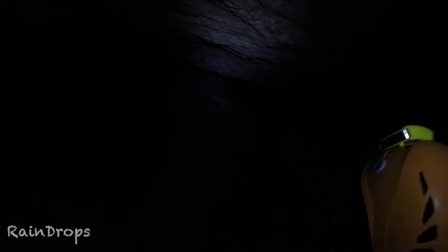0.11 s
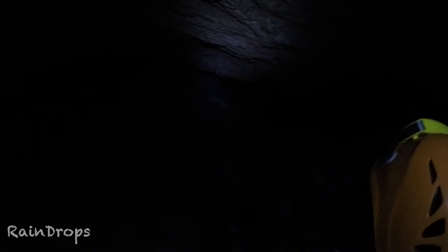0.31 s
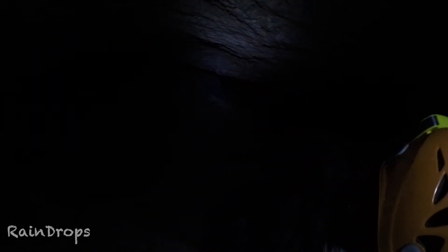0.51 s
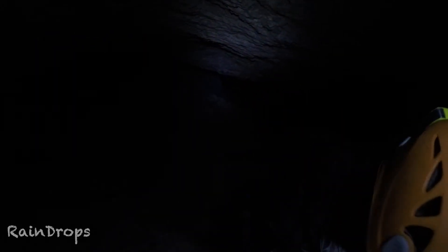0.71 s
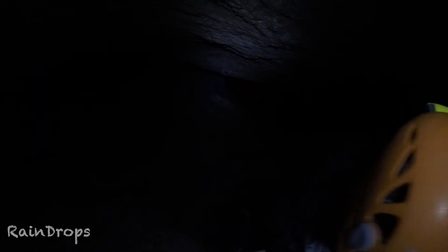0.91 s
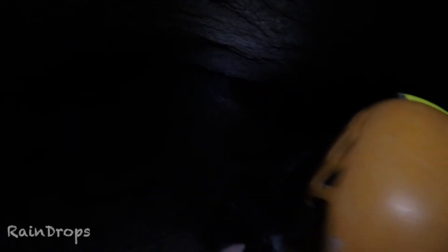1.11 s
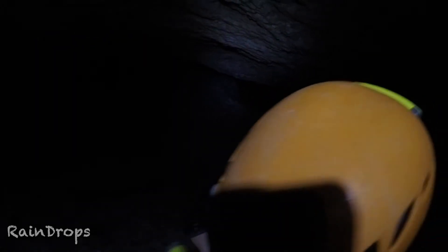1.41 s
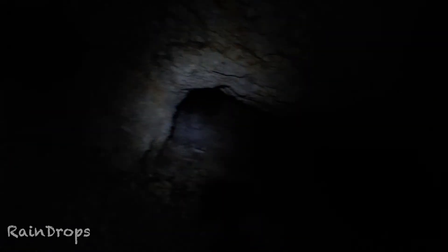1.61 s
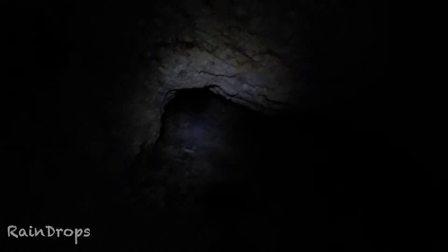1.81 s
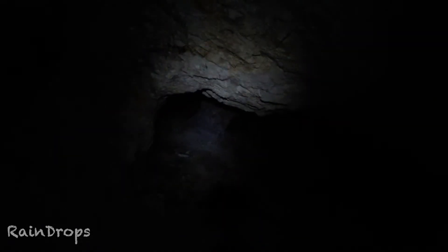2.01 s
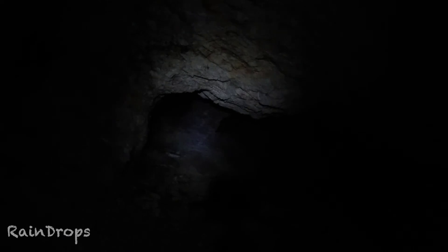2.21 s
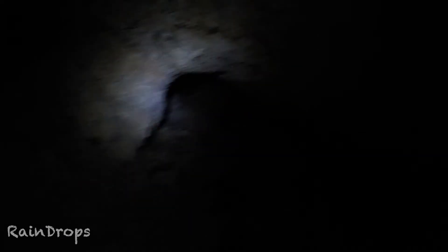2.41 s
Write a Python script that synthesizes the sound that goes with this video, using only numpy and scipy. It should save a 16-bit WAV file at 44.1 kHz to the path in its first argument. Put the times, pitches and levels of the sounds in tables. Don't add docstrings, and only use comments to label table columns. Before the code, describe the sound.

Close, uneven footsteps on rocky ground, slightly right of centre. Grit drags and stones snap in the first half second, quiet taps follow, then a brighter crunch with rubber chirps and cloth rustle, dying into faint hiss.

```python
import sys
import numpy as np
from scipy import signal
from scipy.fft import rfft, irfft
from scipy.io import wavfile

SR = 44100
rng = np.random.default_rng(int(sys.argv[2]) if len(sys.argv) > 2 else 0)


def store_wav(level_fs):
    pcm = np.round(np.clip(np.atleast_2d(level_fs), -1, 1) * 32767)
    wavfile.write(sys.argv[1], SR, pcm.T.astype(np.int16))


def attenuation_scalar(level_db):
    decades = np.asarray(level_db, float) / 20
    return 10 ** decades


N = 114660

# (frequency [Hz], density [dB per Hz])
AIR_COLOUR = [(20, -29.5), (80, -0.5), (350, -4.5), (1000, -15.5), (2500, -27), (3450, -0.5), (5000, -24.5),
              (8000, -28.5)]
# (frequency [Hz], density [dB per Hz])
CLOTH_COLOUR = [(590, -52.5), (1000, -3), (1570, -5), (1720, -2), (4220, -7), (8380, -15.5), (10900, -48),
                (18400, -120)]
# (frequency [Hz], likeness [0-1])
LIKENESS = [(60, 0.78), (200, 0.8), (690, 0.5), (2340, 0.6), (7930, 0)]
# (time [s], level [dB])
RUSTLE = [(0, -75), (.5, -70.5), (.76, -67.5), (.8, -71), (.85, -71), (1.05, -68), (1.25, -71.5),
          (1.53, -78), (1.555, -57.5), (1.6, -69.5), (1.7, -58), (1.8, -59.5), (2.0, -68.5), (2.3, -77)]
# (time [s], peak [dB], length [s], direction [push +1, pull -1])
THUMPS = [
    (0.784, -45.5, .0015, -1),
    (1.483, -48, 0.0016, -1),
    (1.8274, -35, 0.0016, -1),
    (2.068, -52, 0.0043, -1),
    (2.125, -48, 0.0044, 1),
    (2.269, -55, 0.0008, -1),
]
# (time [s], peak [dB], pitch [Hz], length [s])
SQUEAKS = [
    (1.601, -49, 1500, 0.046),
    (1.635, -40, 1409, 0.035),
    (1.876, -52, 2100, 0.038),
    (1.8897, -35.5, 2160, 0.014),
    (1.937, -38, 2200, 0.012),
    (1.9388, -40.5, 2594, .012),
]
# (time [s], peak [dB], pitch [Hz])
CHIPS = [(0.0881, -52, 3430), (0.1086, -47.5, 3240), (0.209, -43.5, 4550), (0.2687, -45.5, 3900),
         (0.4249, -44.5, 3770), (0.4626, -37.5, 6240), (0.6236, -43.5, 4370), (0.674, -49.5, 5160),
         (0.7525, -55, 4500), (1.1229, -54, 3120), (1.4934, -48, 3450), (1.5489, -46.5, 5170),
         (1.565, -48, 3740), (1.6882, -47.5, 3120), (1.7745, -37.5, 4130), (1.872, -49.5, 3810),
         (1.9085, -37, 3100), (1.938, -48.5, 4500), (2.019, -55.5, 3600), (2.0943, -53, 5600),
         (2.1755, -48, 3820)]
# (time [s], peak [dB], pitch [Hz], length [s])
PEBBLES = [(0.089, -47.5, 2300, 0.028), (0.111, -51.5, 1020, 0.0092), (0.207, -44, 1720, 0.017),
           (0.459, -38, 1380, 0.037), (0.464, -33, 920, 0.0047), (0.479, -41.5, 1690, 0.012),
           (0.532, -42.5, 1270, 0.011), (0.562, -49.5, 1520, 0.0068), (0.623, -35, 1280, 0.011),
           (0.652, -43, 1260, 0.012), (0.787, -46, 1026, 0.012), (0.808, -41, 1200, 0.0038),
           (1.003, -59.5, 900, 0.005), (1.088, -63, 2010, 0.0038), (1.121, -51.5, 1800, 0.0044),
           (1.494, -48.5, 1690, 0.008), (1.686, -35.5, 1420, 0.025), (1.705, -35.5, 1500, 0.008),
           (1.743, -34.5, 1350, 0.01), (1.9, -35.5, 1165, 0.026), (1.976, -54, 1120, 0.0051),
           (2.129, -52, 1890, 0.0089), (2.197, -54, 1350, 0.0095), (2.243, -59, 1540, 0.0094),
           (2.319, -51, 900, 0.0038)]
# (time [s], peak [dB], pitch [Hz], length [s])
TREADS = [(0.168, -47, 530, 0.018), (0.205, -44.5, 373, 0.0097), (0.256, -43.5, 336, 0.0099),
          (0.367, -50, 528, 0.0095), (0.483, -36, 406, 0.0016), (0.532, -37.5, 386, 0.01),
          (0.624, -36.5, 417, 0.0036), (0.76, -46.5, 430, 0.025), (0.787, -42.5, 447, 0.006),
          (0.8075, -35.5, 410, 0.0055), (1.008, -47.5, 422, 0.013), (1.27, -54.5, 300, 0.012),
          (1.294, -44.5, 496, 0.014), (1.317, -63, 442, 0.0053), (1.351, -52, 460, 0.012),
          (1.49, -45.5, 398, 0.0078), (1.542, -44.5, 181, 0.01), (1.651, -38.5, 209, 0.01),
          (1.714, -35, 507, 0.019), (1.811, -39, 557, 0.01), (1.902, -32.5, 454, 0.0025),
          (1.959, -49.5, 191, 0.023), (2.256, -68, 353, 0.0078)]
# (time [s], peak [dB], pitch [Hz], ring T60 [s])
SNAPS = [(.168, -54, 685, 0.015), (.18, -47.5, 770, 0.0075), (0.208, -43.5, 2440, 0.0031),
         (0.26, -55, 1510, 0.0039), (.269, -43.5, 960, 0.0066), (0.301, -45, 930, 0.017),
         (.35, -53, 950, .012), (0.357, -44.5, 1260, 0.0094), (.385, -46, 940, 0.007),
         (0.398, -45, 1040, 0.0062), (.454, -35.5, 675, 0.0084), (0.459, -34, 1730, 0.0054),
         (0.4619, -26.5, 1240, 0.0072), (0.469, -30.5, 1330, .012), (.485, -43.5, 800, 0.0067),
         (.5315, -41, 635, 0.014), (0.542, -37, 610, 0.0071), (.649, -51, 1110, 0.007),
         (0.786, -51, 2980, .008), (.808, -52, 2410, .012), (1.007, -53, 800, 0.03),
         (1.294, -62, 760, 0.0093), (1.493, -50, 865, 0.0044), (1.637, -43, 2860, 0.011),
         (1.6572, -41.5, 3920, 0.031), (1.683, -41, 1510, 0.0076), (1.6873, -44.5, 3050, 0.017),
         (1.712, -31.5, 1650, .008), (1.732, -35, 1500, 0.0094), (1.74, -35, 1150, .012),
         (1.759, -38.5, 1600, .012), (1.7743, -28.5, 2390, 0.0064), (1.798, -40, 2000, 0.024),
         (1.8715, -48, 3500, 0.0094), (1.902, -39.5, 630, 0.0062), (1.9085, -41, 4490, 0.0097),
         (2.199, -57, 1270, 0.0092), (2.018, -52, 3700, 0.0122), (2.062, -58, 1410, 0.0073),
         (2.129, -59, 1710, 0.01), (2.27, -56, 780, 0.009), (.789, -50, 1500, .01),
         (.816, -53, 1950, 0.017)]
# (frequency [Hz], density [dB per Hz])
GRIT_COLOUR = [(29, -42), (50, -9), (195, -0.5), (528, 1), (774, -5.5), (1490, -5.5), (4230, -25.5),
               (6890, -31.5), (8000, -32), (10400, -81), (17600, -120)]
# (time [s], level [dB], brightness [dB])
DRAG = [(0, -67, 8), (.1, -56, -0.5), (.16, -59, -1.5), (.27, -47.5, 1), (.33, -51.5, -2), (.44, -45, 1),
        (.495, -49, -2), (.525, -57.5, 0.5), (.56, -54.5, 2.5), (.6, -69.5, -3.5), (.66, -54, 5),
        (.73, -70, -9.5), (1.1, -68, 12.5), (1.23, -70.5, -3.5), (1.32, -56.5, -8.5), (1.4, -66.5, -2.5),
        (1.6, -56, -0.5), (1.72, -44, 5.5), (1.86, -51, -2.5), (2.15, -69.5, -1.5)]

AIR_DB, RUMBLE_DB, RUMBLE_HZ = -70.5, -75.5, 84
TUNNEL_T60_S, TUNNEL_DB, WALL_CUT_HZ, TUNNEL_SPREAD = 0.22, -18.5, 1800, 0.15
SQUEAK_RISE, SQUEAK_WOBBLE, SQUEAK_OCTAVE_DB, SQUEAK_SCRATCH_DB = 0.07, 0.04, -21, -15
CONTACTS_PER_S, CHIP_S = 2200, 0.005
SNAP_SIDE_RATIO, SNAP_SIDE_DB, SNAP_EDGE_DB = 1.258, -6.5, -21
GRAINS_PER_S, GRAIN_SPREAD_DB, GRAIN_CYCLES = 7000, 2, 8
CLUMP_DB, CLUMPS_PER_S = 1.8, 90
BALANCE_DB, LEFT_LAG_S = -2, 3.5e-5
MIC_LOW_HZ, MIC_TOP_HZ = 61.7, 8260
PORT_HZ, PORT_T60_S, PORT_DB = 3420, 0.0056, -80.5


def rms_one(x):
    return x / np.sqrt(np.mean(x ** 2) + 1e-20)


def in_time(rows):
    s, *columns = np.transpose(rows)
    return [np.interp(np.arange(N) / SR, s, column) for column in columns]


def at_hz(points, hz):
    point_hz, value = np.transpose(points)
    return np.interp(np.log(hz), np.log(np.maximum(point_hz, 1)), value)


def drift(rate):
    r = np.exp(-80 * np.pi * rate / SR)
    white = rng.standard_normal(N // 40 + 2002)
    slow = rms_one(signal.lfilter([1], [1, -2 * r, r * r], white)[2000:])
    return np.interp(np.arange(N) / 40, np.arange(len(slow)), slow)


def ring(clicks, hz, t60):
    r = attenuation_scalar(-60 / (t60 * SR))
    w = 2 * np.pi * hz / SR
    return signal.lfilter([0, np.sin(w)], [1, -2 * r * np.cos(w), r * r], clicks + 1e-18)


def filtered(x, order, hz, kind):
    return signal.sosfilt(signal.butter(order, hz, kind, fs=SR, output="sos"), x)


def banded_noise(spectrum, patchy_db):
    out, together = 0, drift(6)
    edges = 22 * 2 ** np.arange(0, 8.9, 1 / 3)
    white = rng.standard_normal((2, 2, N))
    for k, (low, high) in enumerate(zip(edges, edges[1:])):
        mid, side = filtered(white[k % 2], 2, [low, high], "band")
        hz = np.sqrt(low * high)
        alike = np.clip(at_hz(LIKENESS, hz), 0, 1)
        gain = attenuation_scalar(at_hz(spectrum, hz) + patchy_db * (0.2 * together + drift(28)))
        out = out + gain * (np.sqrt(1 + alike) * mid + np.sqrt(1 - alike) * side * [[1], [-1]])
    return rms_one(out)


def still_air():
    return attenuation_scalar(AIR_DB) * banded_noise(AIR_COLOUR, patchy_db=-4.0)


def rumble():
    low = filtered(rng.standard_normal((2, N)), 2, [15, RUMBLE_HZ], "band")
    return attenuation_scalar(RUMBLE_DB + 1.5 * drift(4.9) + np.array([[-2.5], [2.5]])) * rms_one(low)


def cloth():
    colour = [(500, -40)] + list(CLOTH_COLOUR)
    return attenuation_scalar(in_time(RUSTLE)[0]) * banded_noise(colour, patchy_db=1.6)


def tunnel(x):
    out, dull = np.zeros((2, N)), np.exp(-2 * np.pi * WALL_CUT_HZ / SR)
    lags = (rng.uniform(0.008, 0.03, 12) * SR).astype(int)
    for k, lag in enumerate(lags):
        loop, gain, state = x.copy(), attenuation_scalar(-60 * lag / SR / TUNNEL_T60_S), [0.]
        for i in range(lag, N, lag):
            back, state = signal.lfilter([gain * (1 - dull)], [1, -dull], loop[i - lag:i], zi=state)
            loop[i:i + lag] += back[:N - i]
        out[k % 2] += (loop - x) * (-1) ** (k // 2)
    return out


def thumps():
    t, out = np.arange(N) / SR, np.zeros(N)
    for s, db, length_s, way in THUMPS:
        out += np.sign(way) * attenuation_scalar(db) * np.exp(-((t - s - length_s) / length_s * 2) ** 2)
    return out


def squeaks():
    out, wobble, flutter = np.zeros(N), drift(148.37), drift(300)
    t = np.arange(N) / SR
    scratch = attenuation_scalar(SQUEAK_SCRATCH_DB) * rms_one(ring(rng.standard_normal(N), 2000, 0.00036))
    for s, db, hz, length_s in SQUEAKS:
        u = np.clip((t - s) / length_s, 0, 3)
        pitch = hz * (1 + SQUEAK_RISE * np.minimum(u, 1) + SQUEAK_WOBBLE * wobble)
        phase = 2 * np.pi * np.cumsum(pitch) / SR
        swell = (4 * u * np.exp(1 - 4 * u)) ** 1.3 * attenuation_scalar(db + 3 * flutter)
        overtones = attenuation_scalar(SQUEAK_OCTAVE_DB) * (np.sin(2 * phase) + 0.61 * np.sin(3 * phase))
        out += swell * (np.sin(phase) + overtones + scratch * (1 + np.sin(phase)))
    return out


def knocks(rows, cycles, overtone, overtone_db, crack_db, crack_hz):
    out, size = np.zeros(N + SR), SR // 10
    t = np.arange(size) / SR
    for s, db, hz, length_s in rows:
        touching = rng.random(size) < CONTACTS_PER_S / SR
        force, detune = rng.uniform(-1.15, 1, size), rng.uniform(-3.5, 1, 2)
        run = touching * force * np.exp(-(t / max(length_s, 0.001)) ** 1.42)
        run[0] += 1.4
        body = ring(run, hz, cycles / hz)
        body -= 0.38 * ring(run, hz * (1.31 + 0.42 * detune[0]), cycles / hz * 0.57)
        high = hz * overtone * (1 + 0.033 * detune[1])
        body += attenuation_scalar(overtone_db) * ring(run, high, cycles / hz * 0.41)
        body = filtered(body, 2, [hz / 3.0, min(hz * overtone * 2.7, 9000)], "band")
        body += attenuation_scalar(crack_db) * ring(run, crack_hz, 0.0015)
        i = int(s * SR)
        out[i:i + size] += attenuation_scalar(db) * body / np.abs(body).max()
    return out[:N]


def chips():
    rows = [(*row, CHIP_S) for row in CHIPS]
    return knocks(rows, cycles=17.0, overtone=1.44, overtone_db=-5.5, crack_db=-5, crack_hz=5460)


def pebbles():
    return knocks(PEBBLES, cycles=8.5, overtone=1.513, overtone_db=-7, crack_db=-22.5, crack_hz=3700)


def treads():
    return knocks(TREADS, cycles=10.0, overtone=2.85, overtone_db=-15, crack_db=-37, crack_hz=2500)


def snaps():
    out, click = np.zeros(N + SR), np.r_[np.hanning(7), np.zeros(SR // 20)]
    for s, db, hz, t60 in SNAPS:
        body = ring(click, hz, t60)
        body -= attenuation_scalar(SNAP_SIDE_DB) * ring(click, hz * SNAP_SIDE_RATIO, t60)
        body += attenuation_scalar(SNAP_EDGE_DB) * ring(click, hz * 2.7, 0.0016)
        i = int(s * SR)
        out[i:i + len(click)] -= attenuation_scalar(db) * body / np.abs(body).max()
    return out[:N]


def grit():
    level_db, bright_db = in_time(DRAG)
    sizes = attenuation_scalar(GRAIN_SPREAD_DB * np.minimum(rng.exponential(1, N), 4)) * rng.choice([-1, 1], N)
    clump = np.tanh(drift(CLUMPS_PER_S))
    grains = sizes * (rng.random(N) < GRAINS_PER_S / SR)
    pitches, out = np.geomspace(90, 8000, 28), 0
    dealt = (rng.random(N) ** 0.6 * 28).astype(int)
    for k, hz in enumerate(pitches):
        band = rms_one(ring(grains * (dealt == k), hz, GRAIN_CYCLES / hz))
        tilt_db = bright_db * np.log2(hz / 600) / 2
        out = out + band * np.sqrt(hz) * attenuation_scalar(at_hz(GRIT_COLOUR, hz) + tilt_db)
    return rms_one(out) * attenuation_scalar(level_db + CLUMP_DB * clump)


def scene():
    feet = grit() + treads() + pebbles() + chips() + squeaks() + thumps() + snaps()
    feet = filtered(feet, 2, MIC_LOW_HZ, "high")
    echo = attenuation_scalar(TUNNEL_DB) * tunnel(feet)
    feet = feet + echo.mean(axis=0)
    hz = np.fft.rfftfreq(N, 1 / SR)
    left = irfft(rfft(feet) * np.exp(-2j * np.pi * hz * LEFT_LAG_S), N)
    near = np.array([left, feet]) + TUNNEL_SPREAD * (echo - echo[::-1])
    balance = attenuation_scalar([[BALANCE_DB / 2], [-BALANCE_DB / 2]])
    return (near + cloth() + still_air()) * balance + rumble()


def band_limit(x):
    return signal.sosfilt(signal.butter(12, 8530, fs=SR, output="sos"), x)


def record(dry):
    hiss = rng.standard_normal((3, N))
    shared_and_own = hiss[0] + 0.5 * hiss[1:]
    port = attenuation_scalar(PORT_DB) * rms_one(ring(shared_and_own, PORT_HZ, PORT_T60_S))
    return band_limit(filtered(dry + port, 6, MIC_TOP_HZ, "low"))


dry = scene()
out = record(dry)
store_wav(out)
```